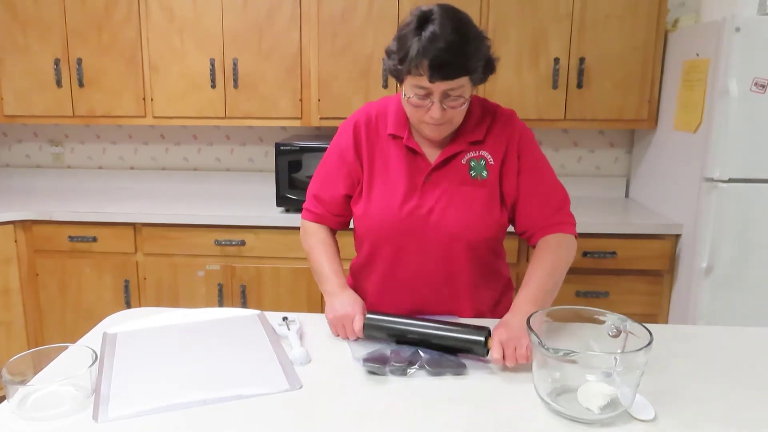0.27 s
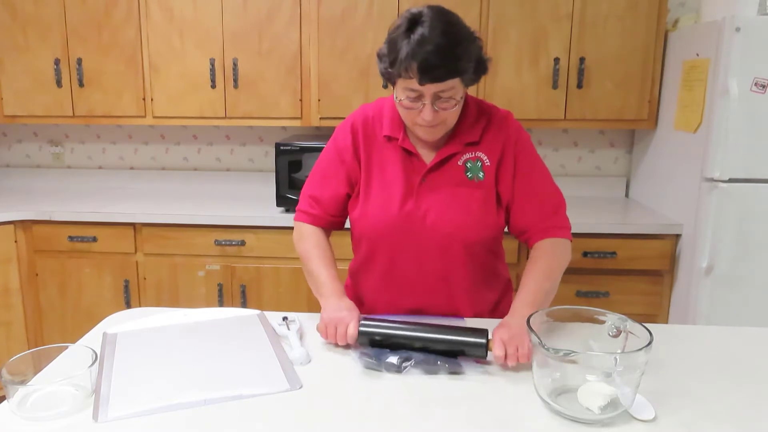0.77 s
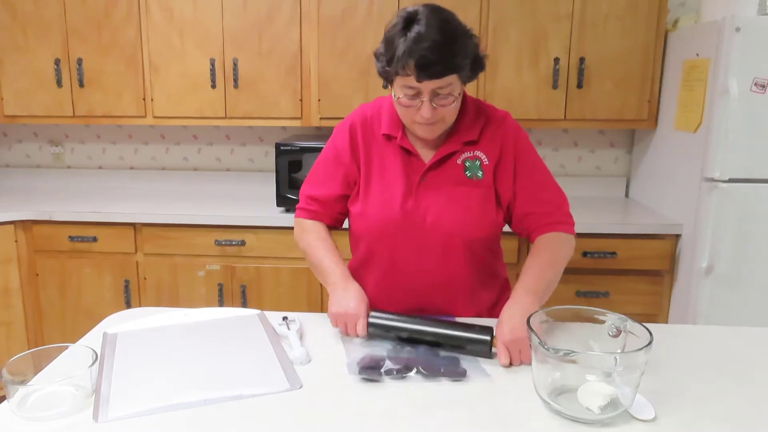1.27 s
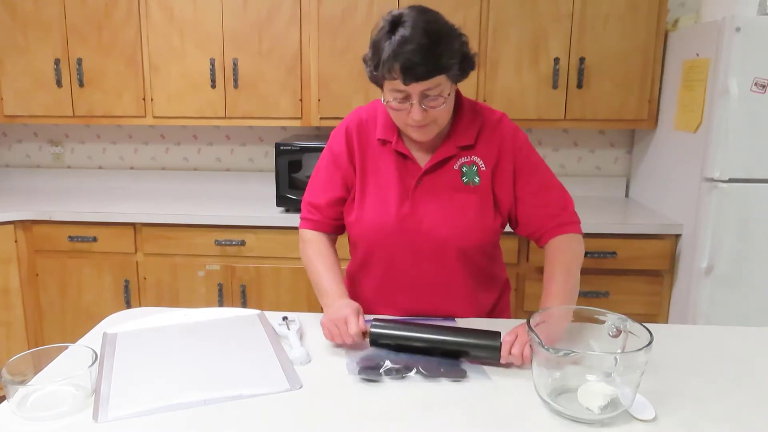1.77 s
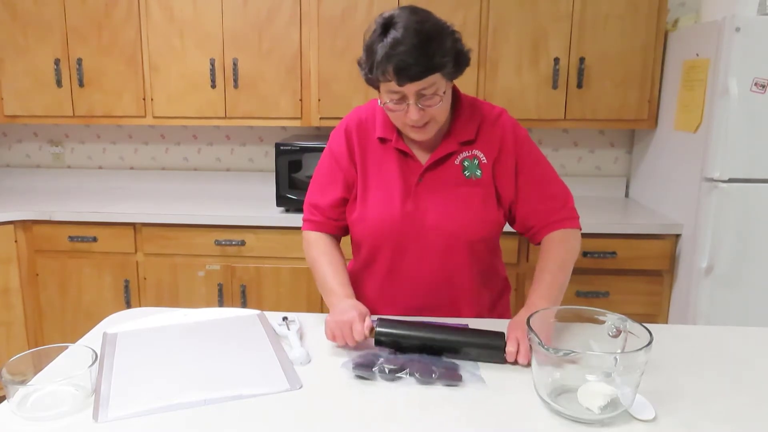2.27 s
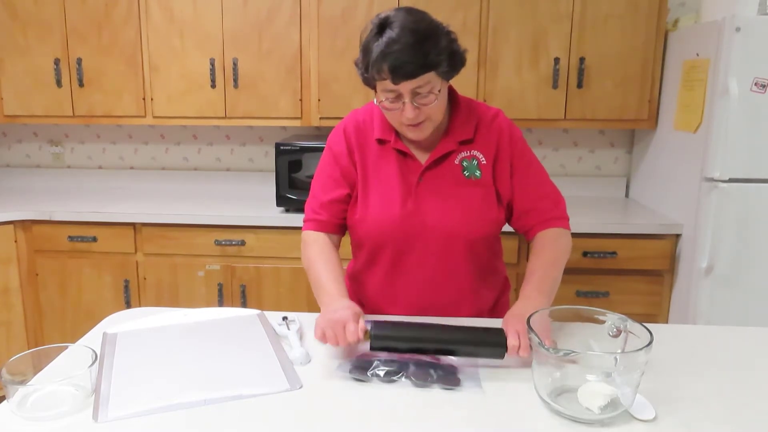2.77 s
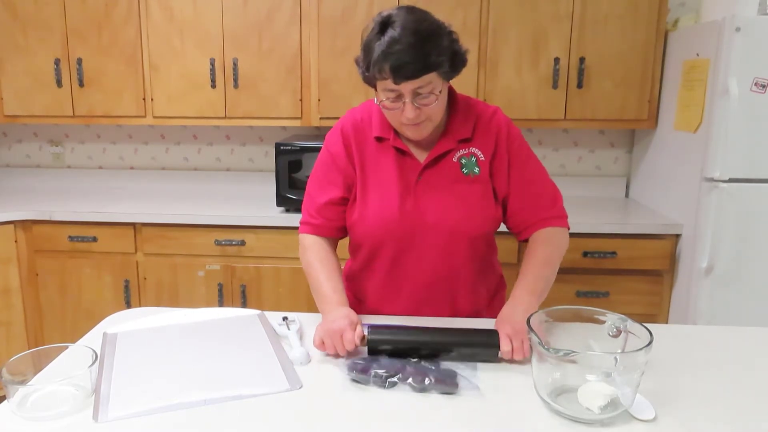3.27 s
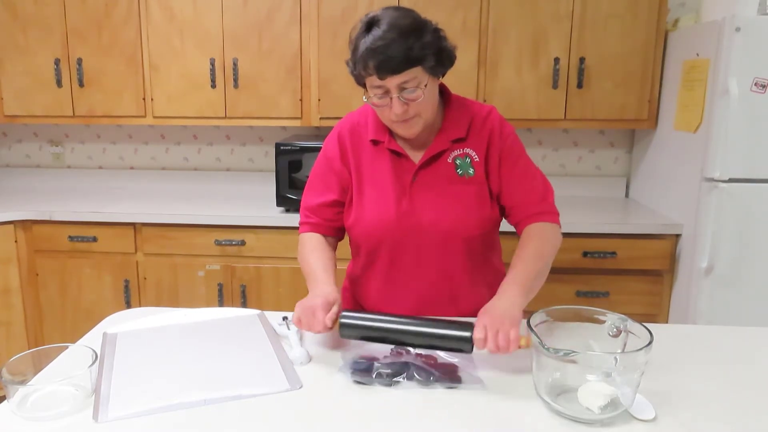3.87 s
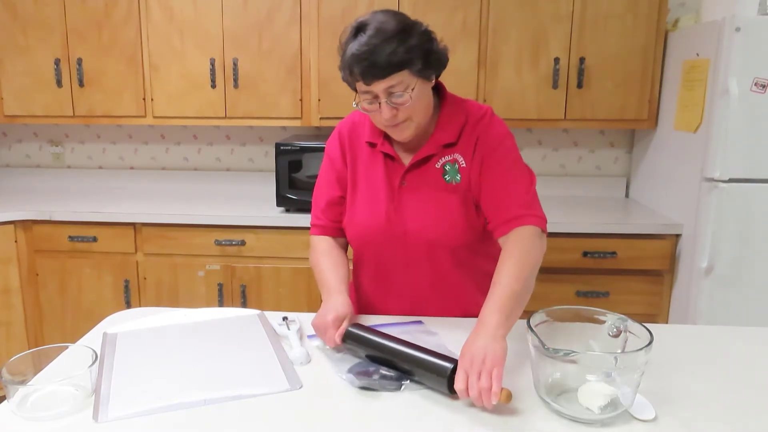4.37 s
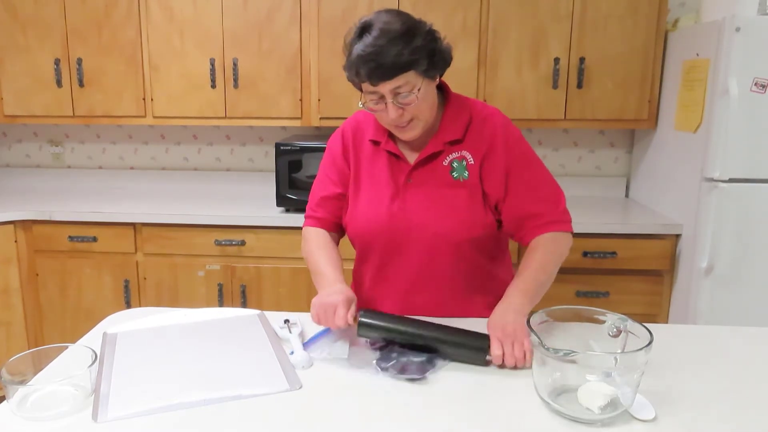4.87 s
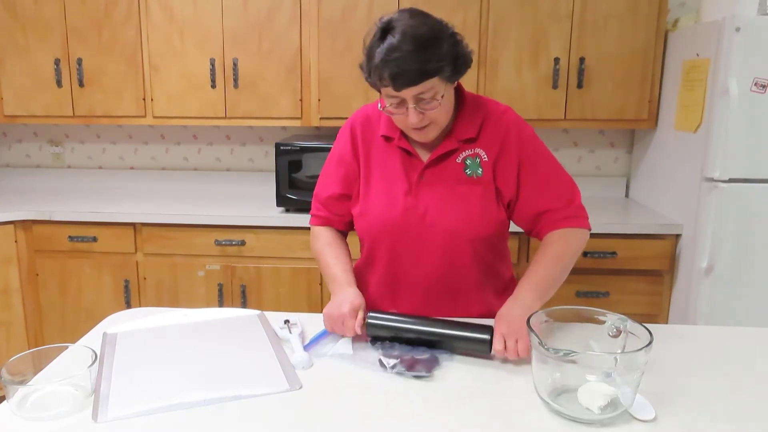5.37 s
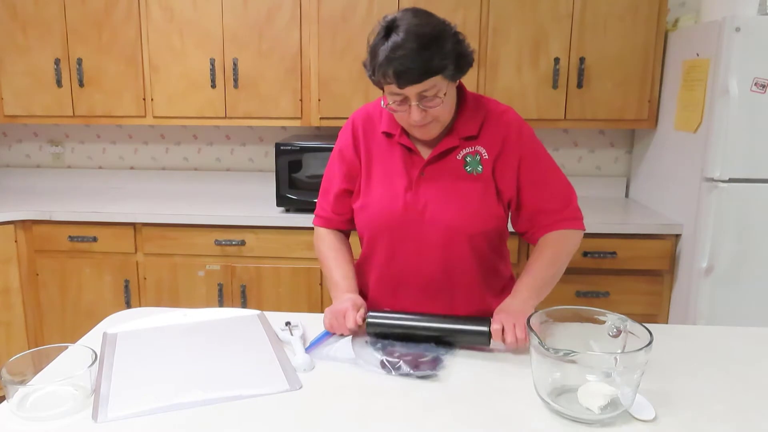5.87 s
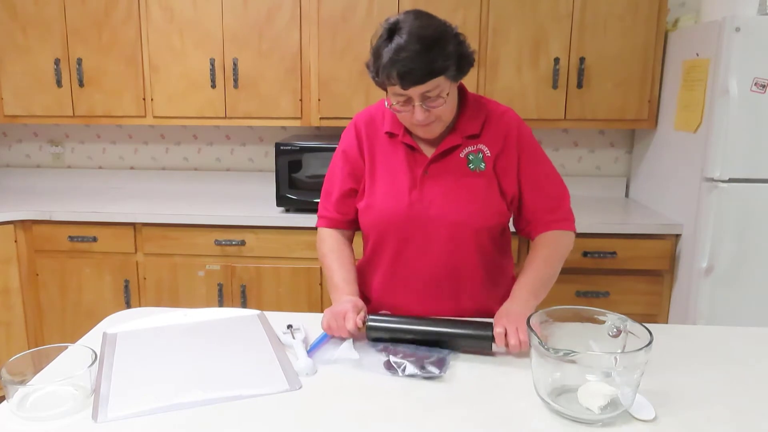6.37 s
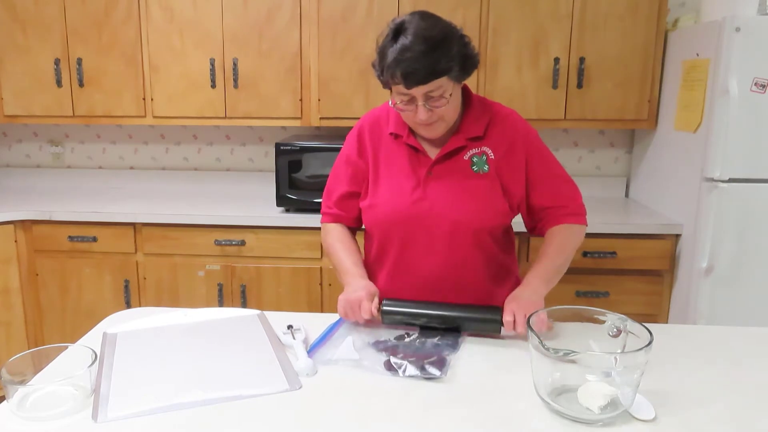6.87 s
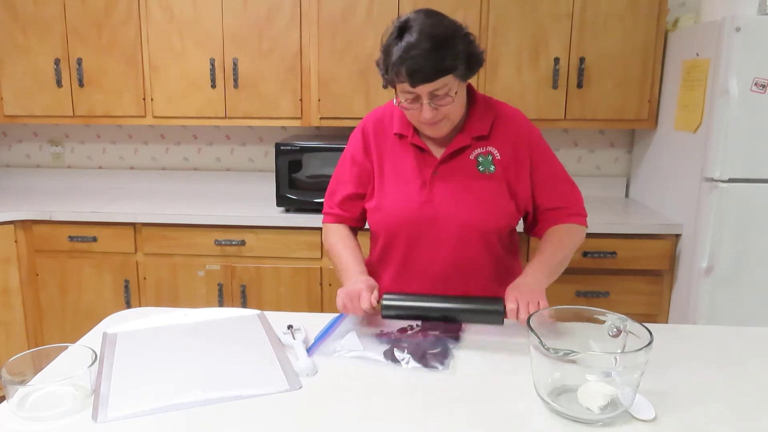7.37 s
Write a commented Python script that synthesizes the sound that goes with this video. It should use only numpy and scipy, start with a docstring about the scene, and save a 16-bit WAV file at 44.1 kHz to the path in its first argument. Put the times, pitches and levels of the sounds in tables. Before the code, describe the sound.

A stone rolling pin crushes sandwich cookies in a plastic bag on a kitchen counter. Gritty crackle and film rustle come in uneven strokes, with low cabinet booms as cookies give way. A heavy crunching landing comes just after one second, more follow, and a brief bag skid comes near five seconds. Denser knocking crunches follow, then a deep thump near seven seconds. Short kitchen reflections, faint hush, fairly close microphone.

```python
"""A stone rolling pin crushes sandwich cookies in a plastic bag on a kitchen counter, over a faint hush.
From the start it grinds crumbs: random fractures ring the stone, shake the counter and crease the bag.
Soon the axle clacks, cookies snap and boom the worktop, and lone ticks come from the bag: decaying avalanches.
From 1.1 s the pin also lands on the bag, a noisy crunch over a modal thump.
Near 4.8 s the bag skids along the counter: clumped fractures excite resonances."""
import sys
import numpy as np
from scipy import signal
from scipy.fft import rfft, irfft
from scipy.io import wavfile
from scipy.ndimage import uniform_filter1d

SR = 44100
rng = np.random.default_rng(int(sys.argv[2]) if len(sys.argv) > 2 else 0)


def materialize(psi):
    """Save the field psi as 16-bit PCM at rate SR to the path in sys.argv[1].

    A 1-D psi becomes a single channel; in a 2-D psi each row is a channel.
    """
    bounded = np.clip(np.atleast_2d(psi).T, -1, 1)
    quanta = np.round(bounded * 32767).astype(np.int16)
    wavfile.write(sys.argv[1], SR, quanta)


N = 335248


def from_db(db):
    """Amplitude factor of a level in dB."""
    return 10 ** (np.asarray(db) / 20)


def rms_one(x):
    """Scales to unit rms."""
    return x / np.sqrt(np.mean(x ** 2) + 1e-20)


def energy_one(x):
    """Scales to unit energy."""
    return x / np.sqrt(np.sum(x ** 2) + 1e-20)


def seconds(length_s):
    """Time axis in s."""
    return np.arange(int(length_s * SR)) / SR


def in_time(rows):
    """Interpolates the columns of a time curve to every sample."""
    time_s, *columns = np.transpose(rows)
    return [np.interp(np.arange(N) / SR, time_s, column) for column in columns]


def at_hz(points, hz):
    """Reads a table on a log-frequency axis."""
    table_hz, values = np.transpose(points)
    return np.interp(np.log(np.maximum(hz, 1)), np.log(table_hz), values)


def add(out, start_s, sound):
    """Mixes a sound in at start_s."""
    i = max(0, round(start_s * SR))
    out[i:i + len(sound)] += sound[:N - i]


def drive(force, response):
    """Output of a body with this impulse response under a force."""
    return signal.fftconvolve(force, response)[:len(force)]


def lowpass(order, hz, sound):
    """Causal Butterworth low-pass."""
    return signal.sosfilt(signal.butter(order, hz, fs=SR, output="sos"), sound)


def tick(spectrum):
    """Minimum-phase impulse response with this spectrum, from its folded cepstrum."""
    n = 2 * len(seconds(.5))
    bins_hz = np.arange(n // 2 + 1) * SR / n
    cepstrum = irfft(np.log(from_db(at_hz(spectrum, bins_hz))))
    causal = irfft(np.exp(rfft(2 * cepstrum[:n // 2], n)))
    return energy_one(causal[:n // 2])


def ring(modes):
    """Impulse response of decaying modes of alternating sign."""
    t = seconds(.5)
    out = 0
    for k, (pitch_hz, level_db, t60_s) in enumerate(modes):
        decay = from_db(level_db - 60 * t / t60_s)
        out = out + (-1) ** k * decay * np.sin(2 * np.pi * pitch_hz * t)
    return energy_one(out)


def wander(size):
    """Slow random curve of unit rms: noise averaged over `size` samples."""
    return rms_one(uniform_filter1d(rng.standard_normal(N), size=size))


def grains(n, per_s, spread_db):
    """Random tiny fractures of either sign: many small, a few large."""
    size = from_db(spread_db * np.minimum(rng.exponential(1, n), 3.2))
    return (rng.random(n) < per_s / SR) * size * rng.choice([-1, 1], n)


def grinding(per_s, spread_db, clump_db):
    """Fractures in clumps of a few milliseconds, levelled to steady power over longer spans."""
    force = grains(N, per_s, spread_db) * from_db(clump_db * wander(size=300))
    return force / np.sqrt(uniform_filter1d(force ** 2, size=2000) + 1e-9)


def collapse(response, crumble_s, per_s, crumble_db):
    """One fracture sets off a dying avalanche of smaller ones; rms 1 over the first 20 ms."""
    t = seconds(.5)
    avalanche = grains(len(t), per_s, 3.6) * np.exp(-t / max(crumble_s, 1e-3))
    force = from_db(crumble_db) * energy_one(avalanche)
    force[0] += 1
    sound = drive(force, response)
    return sound / np.sqrt(np.mean(sound[:SR // 50] ** 2))


def fragments(sound):
    """Pieces of different sizes break in turn: the level of each band wanders by itself."""
    colour_db = 2.8
    out, rest = 0, sound
    for split_hz in np.geomspace(900, 9000, num=7):
        band = signal.sosfiltfilt(signal.butter(3, split_hz, fs=SR, output="sos"), rest)
        out = out + band * from_db(colour_db * wander(size=500) - 1.0)
        rest = rest - band
    return out + rest


def brighten(sound, treble_db):
    """A harder contact lifts the part above 2 kHz by treble_db and lowers the rest by half of it."""
    dull = lowpass(1, 2000, sound)
    return from_db(-treble_db / 2) * dull + from_db(treble_db) * (sound - dull)


# modes of counter and cabinet: pitch_hz, level_db (relative), t60_s
COUNTER_MODES = [(86.9, -9, 0.59), (153, -10, 0.067), (196.8, 1.5, 0.28), (220, 3, 0.033),
                 (254.8, 13.5, 0.074), (298, 6.5, 0.07), (384.8, 5, 0.12), (394.4, 2, 0.19),
                 (430, -3.5, 0.17), (523, -6, 0.066), (620, -25, 0.13), (629, 0.5, .14),
                 (685.5, -0.5, 0.15)]


def counter(spectrum, modes_db):
    """A dull push on the worktop together with the cabinet's modes."""
    return energy_one(tick(spectrum) + from_db(modes_db) * ring(COUNTER_MODES))


# modes of the stone pin: pitch_hz, ground_db (on crumbs), knocked_db (both relative), t60_s
PIN_MODES = [(902, -26, -13.5, 0.079), (1156, -17, -3, 0.06), (1487, -26.5, -6.5, 0.11),
             (1840, -21, -6, .07), (2303, -19.5, -9.5, 0.24), (2540, -13.5, -19, 0.012),
             (4390, -5, -10, .04), (7087, 4.5, -4.5, .028), (10255, 2.5, -30, 0.016), (13950, -3, -29, .01)]


def stone(force):
    """The contact wanders along the pin, so its modes take turns to sing."""
    wander_db = 3.5
    out = 0
    for pitch_hz, ground_db, _, t60_s in PIN_MODES:
        push = force * from_db(ground_db + wander_db * wander(size=900))
        out = out + drive(push, ring([(pitch_hz, 0, t60_s)]))
    return out


def knocked_pin():
    """The pin's ring after a hard blow, cut short by the hands that hold it."""
    longest_t60_s = .14
    return ring([(pitch_hz, knocked_db, min(t60_s, longest_t60_s))
                 for pitch_hz, _, knocked_db, t60_s in PIN_MODES])


def swells(rows, rise_db_per_s, fall_db_per_s):
    """Summed power of rumble and grit: each row (start, length, two levels) rises, holds and falls."""
    t, power = np.arange(0, N, 100) / SR, 0
    for start_s, length_s, rumble_db, grit_db in rows:
        rise_db = rise_db_per_s * np.maximum(start_s - t, 0)
        drop_db = rise_db + fall_db_per_s * np.maximum(t - start_s - length_s, 0)
        power = power + from_db([rumble_db - drop_db, grit_db - drop_db]) ** 2
    return np.array([np.interp(np.arange(N) / SR, t, p) for p in power])


AFTER_RISE_DB_PER_S, AFTER_DELAY_S = 2498, 0.0097


def strewn(blows, after):
    """Each blow (start_s, low_db, high_db) leaves a dying spray of crumbs in proportion to it."""
    rumble_db, grit_db, hold_s, fall_db_per_s = after
    rows = [(start_s + AFTER_DELAY_S, hold_s, low_db + rumble_db, high_db + grit_db)
            for start_s, low_db, high_db in blows]
    return swells(rows, AFTER_RISE_DB_PER_S, fall_db_per_s)


# pin rolls over loose crumbs: start_s, length_s, level_db (relative)
STROKE_ROWS = [(0.038, 0.38, -50.5), (0.479, 0.47, -46), (1.084, 0.44, -51.5), (1.667, 0.039, -52),
               (1.96, 0.7, -49), (2.908, 0.22, -40.5), (3.247, 0.53, -51.5), (4.152, 0.33, -45),
               (4.56, 0.34, -57), (5.177, 1.507, -48.5), (6.914, 0.41, -51.5)]
STROKE_RISE_DB_PER_S, STROKE_FALL_DB_PER_S = 461, 207.5
STROKE_RUMBLE_DB = -2   # relative to the grit
# pin flattens a heap of pieces: start_s, length_s, rumble_db, grit_db (relative)
CRUSH_ROWS = [(.22, 0.1, -30.5, -32.5), (.53, 0.072, -39, -39), (.65, 0.053, -29.5, -29),
              (.73, .035, -36, -43.5), (.855, 0.019, -41, -36), (1.25, 0.11, -25, -28),
              (1.69, 0.044, -42, -33), (1.965, 0.033, -38.5, -39), (2.095, 0.024, -36, -38),
              (2.22, 0.15, -33, -34.5), (2.4, 0.075, -40, -45), (2.56, 0.06, -34, -36),
              (2.94, 0.11, -26.5, -29.5), (3.29, 0.066, -25.5, -33.5), (3.56, 0.021, -40.5, -45),
              (4.18, 0.068, -29.5, -25.5), (4.365, 0.088, -36, -51), (4.72, 0.03, -42.5, -41),
              (4.835, 0.057, -39, -38.5), (5.41, .06, -31, -31.5), (5.63, 0.054, -24.5, -29.5),
              (5.775, 0.049, -33, -33), (5.935, 0.078, -29, -30.5), (6.095, 0.055, -30.5, -30.5),
              (6.255, 0.05, -29, -32), (6.42, 0.04, -35, -34), (6.55, 0.055, -34, -37.5),
              (7.1, 0.026, -32, -35.5), (7.29, 0.04, -50.5, -43.5)]
CRUSH_RISE_DB_PER_S, CRUSH_FALL_DB_PER_S = 556, 349
# crumbs bursting on after a blow: rumble_db, grit_db (relative to the blow), hold_s, fall_db_per_s
LANDING_SPRAY = (-22, -24, 0.0014, 167)
BREAK_SPRAY = (-19.5, -10, 0.0019, 198)


def crumbling():
    """Crumb bursting as (rumble dB, grit dB): powers of strokes, heaps and sprays after blows add up."""
    strokes = [(start_s, length_s, level_db + STROKE_RUMBLE_DB, level_db)
               for start_s, length_s, level_db in STROKE_ROWS]
    landed = [(start_s, level_db, level_db) for start_s, level_db, _, _ in LANDING_ROWS]
    broken = [(start_s, boom_db, crack_db) for start_s, boom_db, _, crack_db in BREAK_ROWS]
    power = swells(strokes, STROKE_RISE_DB_PER_S, STROKE_FALL_DB_PER_S)
    power += swells(CRUSH_ROWS, CRUSH_RISE_DB_PER_S, CRUSH_FALL_DB_PER_S)
    power += strewn(landed, LANDING_SPRAY)
    power += strewn(broken, BREAK_SPRAY)
    return 10 * np.log10(power + 1e-12)


# how hard crumbs bear on the stone: time_s, ring_db (relative)
BEARING_CURVE = [(0, -5.5), (.85, -1), (1.1, -24.5), (1.85, -19.5), (2.0, -6), (2.65, -3.5), (2.9, -26.5),
                 (3.5, 1.5), (4.2, -13.5), (5.2, -3.5), (6.7, -6), (7.6, 4)]
# slack bag film being creased: time_s, rustle_db (relative to the grit)
SLACK_CURVE = [(0, -4.5), (.7, -8.5), (1.2, -7), (1.75, -2), (2.3, -11.5), (3.0, -6), (3.7, 4), (4.2, -3),
               (4.5, 1), (5.2, -6.5), (6.0, -17), (6.7, -3.5), (7.3, -4)]
# spectra of counter rumble, crumb grit and bag film: pitch_hz, density_db (per Hz, relative)
RUMBLE_SPECTRUM = [(25, -9.5), (45, -13.5), (65, -1.5), (110, 2.5), (230, 4.5), (400, -1.5), (650, -1),
                   (850, -8), (1300, -10), (2500, -26), (8000, -53.5)]
GRIT_SPECTRUM = [(100, -13), (600, 1.5), (1150, 8.5), (1700, 1.5), (2500, 6), (3500, -4), (5000, -4),
                 (8000, -11.5), (11000, -13.5), (15500, -36.5)]
FILM_SPECTRUM = [(300, -24), (1500, -7.5), (3000, 3), (5000, 1), (8000, -1.5), (11000, -10), (15500, -17)]


def rolling():
    """Crumbs burst under the moving pin: crackle, ring the stone, shake the counter, crease the bag."""
    rumble_db, grit_db = crumbling()
    (ring_db,), (slack_db,) = in_time(BEARING_CURVE), in_time(SLACK_CURVE)
    crumbs = grinding(per_s=3000, spread_db=7.0, clump_db=3.0)
    grit = crumbs * from_db(grit_db - 3.5)
    creases = grinding(per_s=1800, spread_db=3.5, clump_db=0.5) * from_db(grit_db + slack_db - 2.5)
    rumble = drive(crumbs * from_db(rumble_db - 2.0), counter(RUMBLE_SPECTRUM, modes_db=-8.0))
    crackle = fragments(drive(grit, tick(GRIT_SPECTRUM)) + drive(creases, tick(FILM_SPECTRUM)))
    return rumble + crackle + stone(grit * from_db(ring_db - 14.0))


# pin knocks on its axle: start_s, level_db, treble_db, ring_db (barrel; all relative)
CLACK_ROWS = [(.08, -21.5, -14, -7), (0.442, -36.5, -8, 14.5), (1.068, -34.5, -5, 10),
              (2.731, -22.5, -5, 13), (3.8, -20, 5.5, 3.5), (4.132, -26.5, -5, 13), (4.352, -24, -4, 7.5),
              (4.397, -26.5, -13, 2), (7.362, -20.5, 6, 7)]
# axle knock spectrum: pitch_hz, density_db (per Hz, relative)
AXLE_SPECTRUM = [(80, -4.5), (350, -12), (650, -21), (1150, -3), (1800, -12.5), (2350, 1), (3100, -10.5),
                 (4000, -4.5), (5500, -10.5), (8000, -21.5), (14000, -37)]


def clacks():
    """The loose barrel hits its axle, rattles for an instant and rings on."""
    out, knock, barrel = np.zeros(N), tick(AXLE_SPECTRUM), knocked_pin()
    for start_s, level_db, treble_db, ring_db in CLACK_ROWS:
        rattle = from_db(-15.5) * collapse(knock, 0.0021, per_s=7000, crumble_db=12.0)
        clack = brighten(rattle + from_db(ring_db) * barrel, treble_db)
        add(out, start_s, from_db(level_db) * clack)
    return out


# cookie gives way under the pin: start_s, boom_db, knock_db (woody), crack_db (all relative)
BREAK_ROWS = [(0.136, -19, -35, -32.5), (0.189, -12.5, -32, -32), (0.236, -14, -23, -31),
              (0.618, -24, -37, -33.5), (.663, -19, -35, -27.5), (0.847, -35, -48.5, -38.5),
              (1.268, -19.5, -15, -23.5), (2.079, -18, -38, -34.5), (2.315, -12, -16, -31.5),
              (3.001, -10, -23.5, -30), (3.272, -11, -21, -26), (4.272, -27, -31.5, -31),
              (4.689, -18, -29, -34), (4.908, -15.5, -19.5, -26), (5.407, -24.5, -29, -43),
              (5.46, -13.5, -23, -27), (5.627, -19, -23, -48), (5.684, -24, -24, -28),
              (5.748, -18, -34, -33), (5.819, -14.5, -26.5, -34), (5.971, -18, -19.5, -28),
              (6.034, -20, -23.5, -23), (6.153, -18.5, -59, -38), (6.283, -24.5, -44, -45),
              (6.554, -25, -49, -40), (6.593, -28.5, -63, -34.5)]
BREAK_CRUMBLE_S = 0.019
# worktop thud spectrum: pitch_hz, density_db (per Hz, relative)
THUD_SPECTRUM = [(30, -50.5), (90, -18), (160, 2.5), (260, 6), (420, 4.5), (680, -3.5), (850, -21),
                 (1300, -14.5), (2500, -26), (8000, -41.5)]


def breaks():
    """A cookie snaps and the pin falls through it: the worktop knocks and the cabinet booms."""
    thuds, cracks = np.zeros((2, N))
    thud, crack = counter(THUD_SPECTRUM, modes_db=0.5), tick(GRIT_SPECTRUM)
    boom = lowpass(3, 450, thud)
    knock = signal.sosfilt(signal.butter(3, 450, "high", fs=SR, output="sos"), thud)
    for start_s, boom_db, knock_db, crack_db in BREAK_ROWS:
        booming = collapse(boom, BREAK_CRUMBLE_S, per_s=1400, crumble_db=-14.0)
        knocking = collapse(knock, BREAK_CRUMBLE_S, per_s=2300, crumble_db=-6.0)
        cracking = collapse(crack, BREAK_CRUMBLE_S * 0.57, per_s=4900, crumble_db=7.0)
        add(thuds, start_s + 0.0019, from_db(boom_db - 8.0) * booming)
        add(thuds, start_s + 0.00204, from_db(knock_db - 2) * knocking)
        add(cracks, start_s + 0.0036, from_db(crack_db - 2) * cracking)
    return thuds + fragments(cracks)


# sharpest single snaps of crumb and film: start_s, level_db (relative)
SNAP_ROWS = [(.285, -10), (0.353, -10.5), (0.5258, -10), (0.791, -14), (0.955, -25), (1.2328, -4),
             (1.4572, -18), (1.509, -19.5), (2.1236, -13.5), (3.76, -14.5), (3.835, -22.5), (4.365, -11),
             (4.7323, -13.5), (5.5092, -10.5), (5.9486, -22), (6.318, -12), (6.444, -13)]


def snaps():
    """Lone sharp ticks from the bag: very short avalanches through the film's spectrum."""
    out, film = np.zeros(N), tick(FILM_SPECTRUM)
    for start_s, level_db in SNAP_ROWS:
        snap = collapse(film, 0.00058, per_s=6000, crumble_db=4.0)
        add(out, start_s, from_db(level_db - 30.5) * snap)
    return out


# pin comes down on the bag: start_s, level_db (relative), crumble_s, treble_db
LANDING_ROWS = [(1.098, -8, 0.0081, -1), (1.104, -1, 0.0054, -3), (1.657, -28, 0.0089, -10.5),
                (1.666, -9, 0.0049, 4.5), (2.896, -11.5, 0.0044, -0.5), (2.922, -15.5, 0.0033, 0),
                (4.151, -14, 0.0054, 12), (5.175, -17, 0.024, -7.5), (5.196, -6, 0.0092, 2),
                (5.218, -14, 0.004, -12), (6.919, -14, .003, -8.5), (6.922, -5.5, 0.013, -15)]
# landing pin's weight reaches the worktop: start_s, level_db (relative)
THUMP_ROWS = [(1.101, -16), (1.66, -18.5), (2.9, -21), (2.935, -20.5), (4.146, -15.5), (4.181, -16),
              (5.199, -26.5), (6.921, -10.5)]
# spectra of crunch and worktop thump: pitch_hz, density_db (per Hz, relative)
CRUNCH_SPECTRUM = [(100, 8.5), (600, -5.5), (1000, 2), (1450, 1), (1800, -1), (2400, 0), (3500, -3.5),
                   (5200, -5), (8000, -12.5), (11000, -17.5), (15500, -31.5)]
THUMP_SPECTRUM = [(22, -45), (45, -17.5), (65, -4), (85, -4), (110, 0), (160, 0.5), (240, -17), (400, -17),
                  (650, -18), (1500, -17.5), (8000, -67.5)]


def landings():
    """The pin drops on the bag: a crunch and a short ring over a deep thump of the counter."""
    out = np.zeros(N)
    crunch = tick(CRUNCH_SPECTRUM) + from_db(-16.5) * knocked_pin()
    sway = from_db(1) * ring([(87.2, 0, 0.35)])   # the whole worktop
    thump = counter(THUMP_SPECTRUM, modes_db=-6.0) + sway
    for start_s, level_db, crumble_s, treble_db in LANDING_ROWS:
        crunching = collapse(crunch, crumble_s, per_s=5000, crumble_db=15.5)
        add(out, start_s, from_db(level_db - 17.5) * brighten(crunching, treble_db))
    for start_s, level_db in THUMP_ROWS:
        thumping = collapse(thump, 0.007, per_s=810, crumble_db=-10.0)
        add(out, start_s, from_db(level_db - 9.0) * thumping)
    return out


# bag skids along the counter: time_s, level_db (relative)
SKID_CURVE = [(4.72, -81), (4.8, -55), (4.835, -35), (4.9, -42), (4.95, -32), (5.02, -91)]
# skid resonances: pitch_hz, level_db (relative), t60_s
SKID_RESONANCES = [(645, -1, 0.025), (1000, -9.5, 0.052), (1360, 5.5, 0.022), (1380, 1, 0.018)]


def skid():
    """The loaded bag sticks and slips on the worktop: clumped fractures drive its resonances."""
    (level_db,) = in_time(SKID_CURVE)
    slips = grinding(per_s=810, spread_db=8.5, clump_db=2.0)
    return drive(slips * from_db(level_db), ring(SKID_RESONANCES))


# kitchen decay: pitch_hz, t60_s
KITCHEN_DECAY = [(80, 0.51), (250, 0.23), (600, 0.22), (1500, 0.16), (4000, 0.24), (8000, 0.18),
                 (15000, 0.27)]


def kitchen(early_s, tail_db):
    """The room's answer to one spot: quick reflections, a tail that dies by band."""
    t, edges_hz = seconds(.5), np.geomspace(150, 18000, num=10)
    white, room = rng.standard_normal((2, len(t))), 0
    for k, (low_hz, high_hz) in enumerate(zip(edges_hz, edges_hz[1:])):
        bandpass = signal.butter(2, [low_hz, high_hz], "band", fs=SR, output="sos")
        band = signal.sosfilt(bandpass, white[k % 2])
        t60_s = at_hz(KITCHEN_DECAY, np.sqrt(low_hz * high_hz))
        fading = from_db(tail_db - 60 * t / t60_s) + np.exp(-t / early_s)
        room = room + band * fading * (t > .001)
    return energy_one(room)


def reflections(sound, count):
    """The pin passes over several spots in turn, each with its own echoes, crossfaded."""
    spot = 40 * np.arange(N) / SR   # 40 spots per s, cyclic
    out = 0
    for k in range(count):
        distance = np.abs((spot - k + count / 2) % count - count / 2)
        share = np.sqrt(np.maximum(1 - distance, 0))
        out = out + drive(sound * share, kitchen(early_s=.006, tail_db=-3.0))
    return out


# hush spectrum: pitch_hz, density_db (per Hz, relative)
HUSH_SPECTRUM = [(25, 8), (130, -2.5), (400, -26), (1300, -25.5), (3000, -33.5), (7000, -26.5),
                 (15000, -52)]
HUSH_DB = -63.5


def room_hush():
    """Faint steady noise: white noise shaped by the hush spectrum."""
    return from_db(HUSH_DB) * drive(rng.standard_normal(N), tick(HUSH_SPECTRUM))


def scene():
    """All the crushing, direct and reflected by the room, over its faint hush."""
    crushing = rolling() + clacks() + breaks() + snaps() + landings() + skid()
    direct = from_db(-1.0) * crushing
    echoes = from_db(-6.5) * reflections(crushing, count=6)
    return (direct + echoes + room_hush())[None]


CUTOFF_HZ = 15750


def record(dry):
    """The microphone sheds the deepest bass, the loudest peaks are rounded, the top is cut."""
    ceiling = .42
    thinned = signal.sosfilt(signal.butter(2, 34, "high", fs=SR, output="sos"), dry)
    rounded = ceiling * np.tanh(thinned / ceiling)
    return signal.sosfilt(signal.ellip(10, .3, 80, CUTOFF_HZ, fs=SR, output="sos"), rounded)


dry = scene()
out = record(dry)
materialize(out)
```